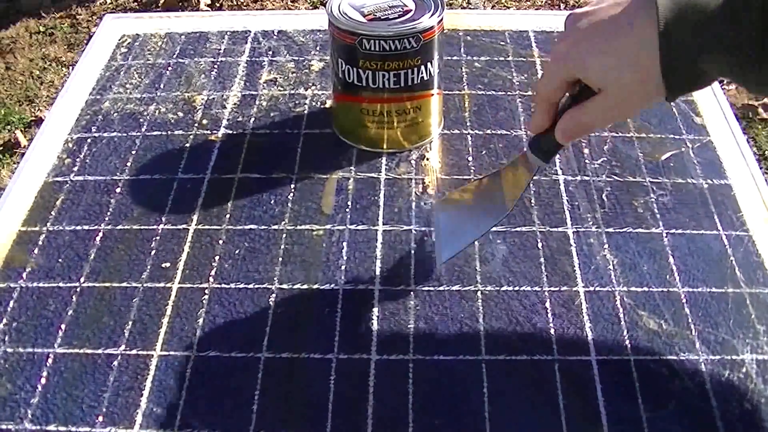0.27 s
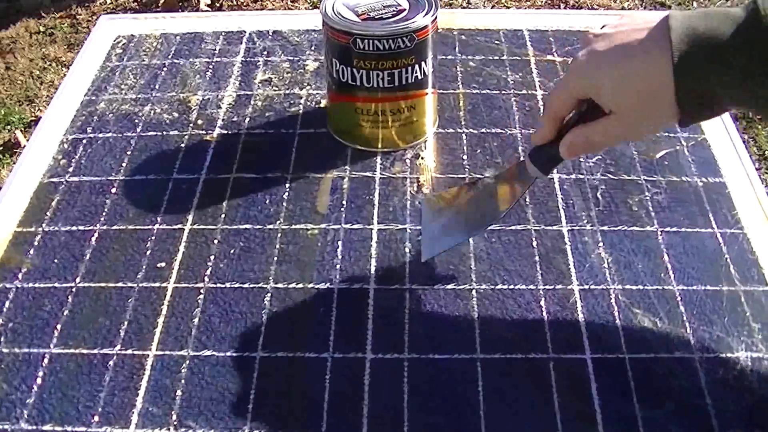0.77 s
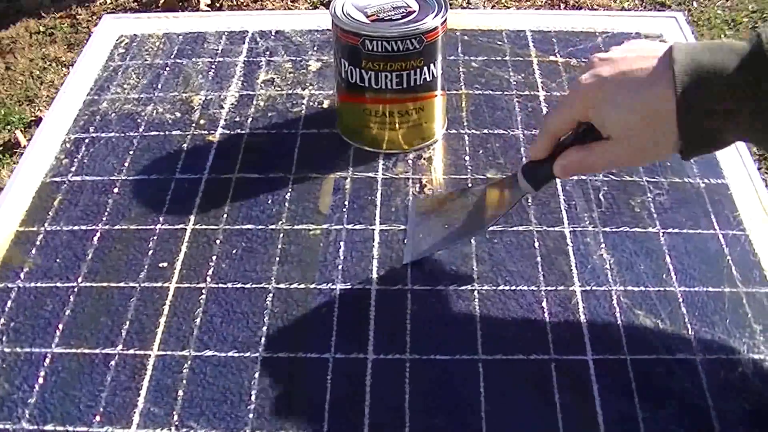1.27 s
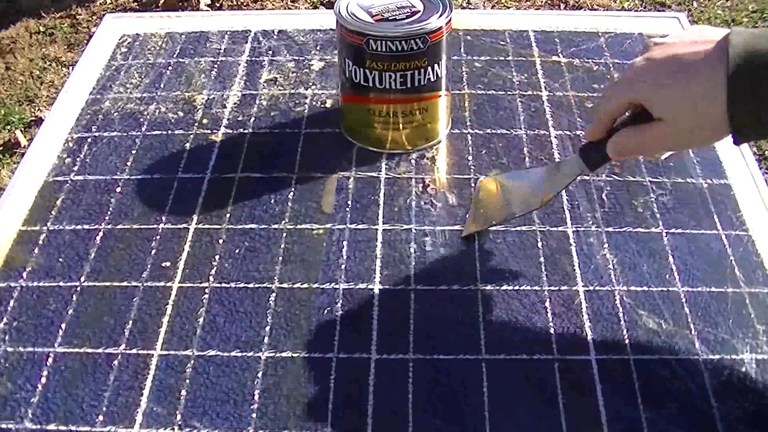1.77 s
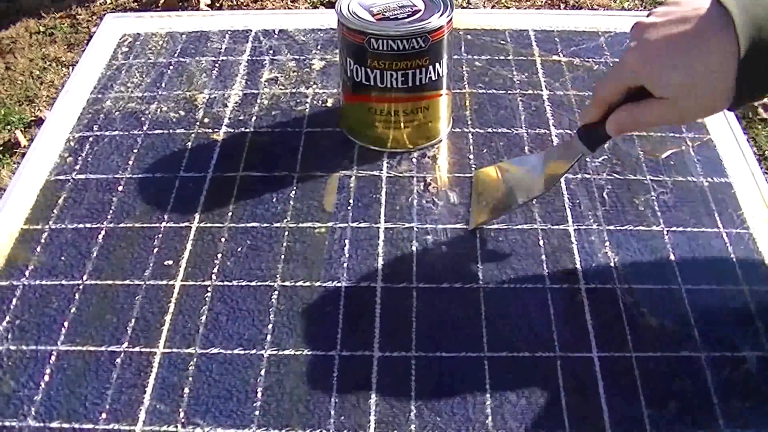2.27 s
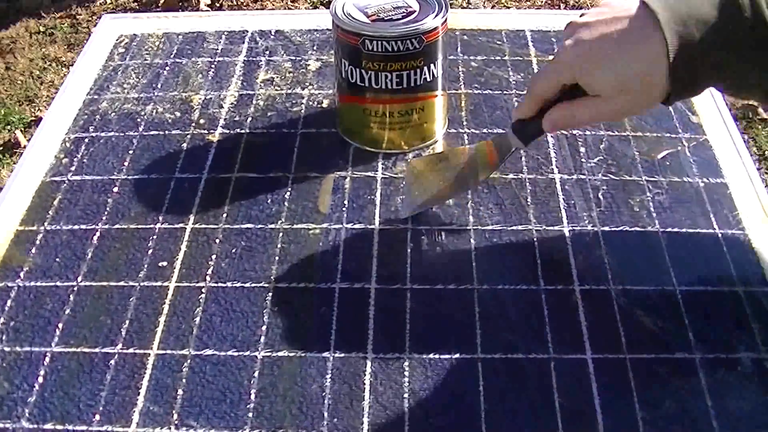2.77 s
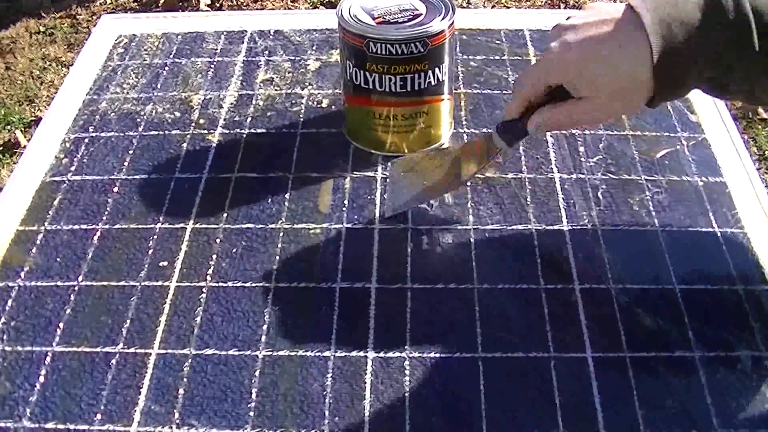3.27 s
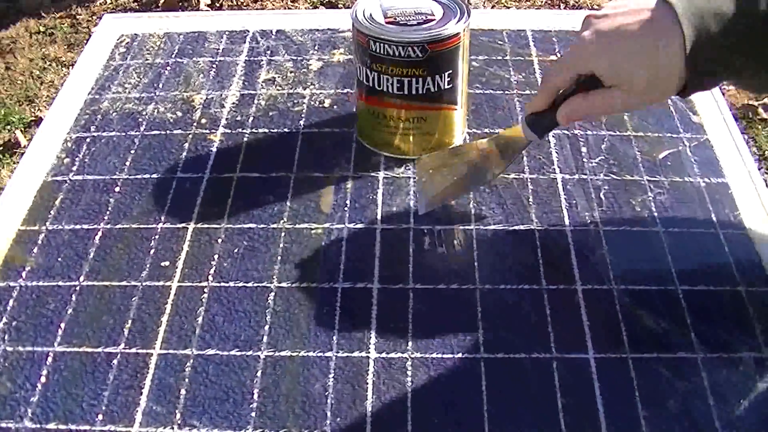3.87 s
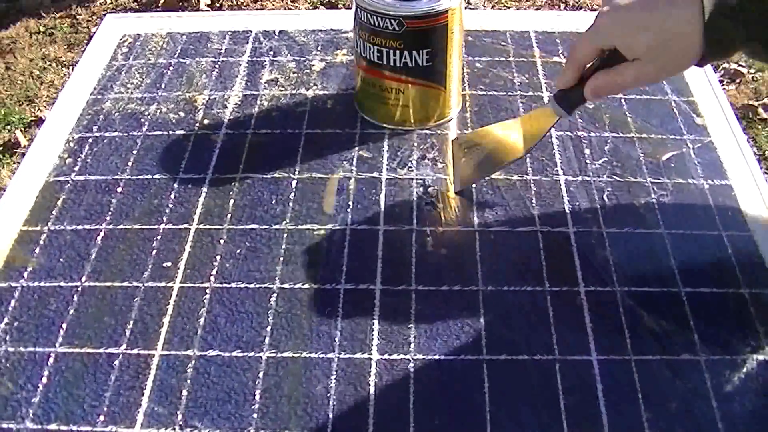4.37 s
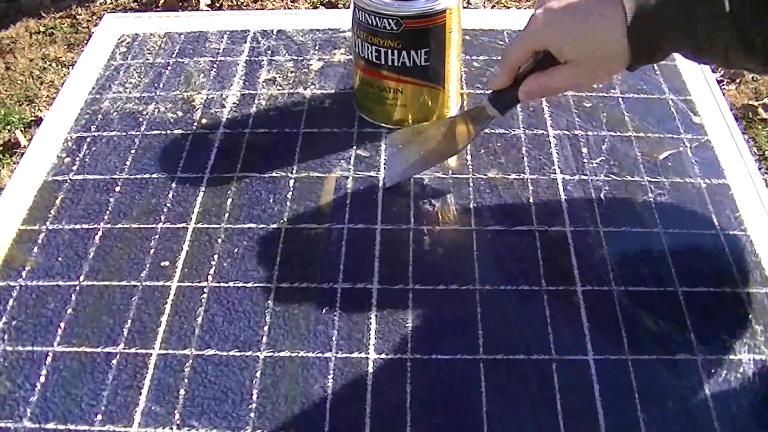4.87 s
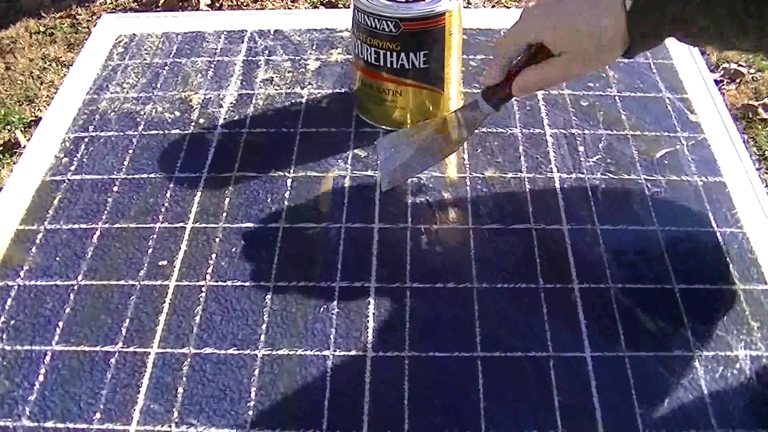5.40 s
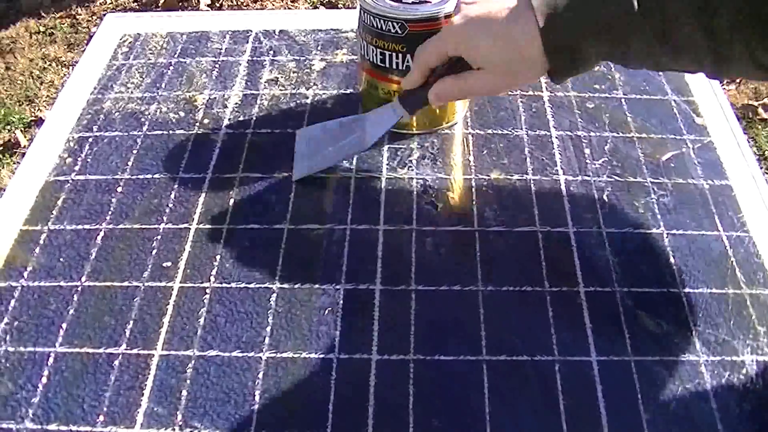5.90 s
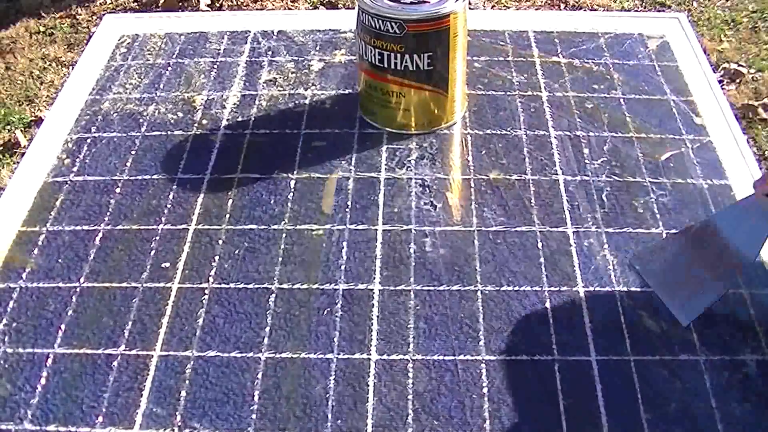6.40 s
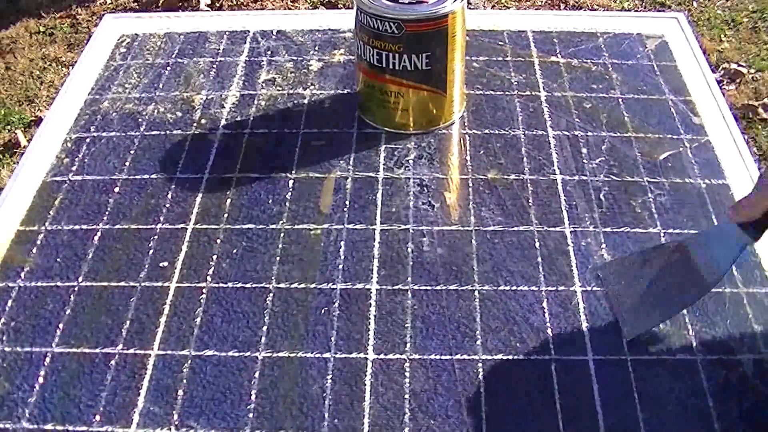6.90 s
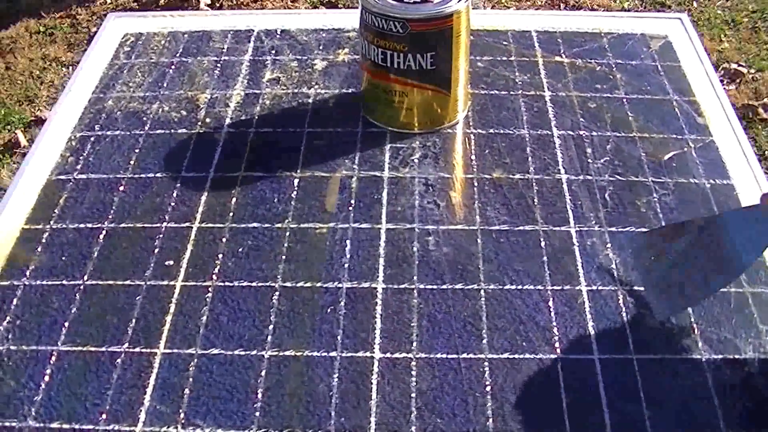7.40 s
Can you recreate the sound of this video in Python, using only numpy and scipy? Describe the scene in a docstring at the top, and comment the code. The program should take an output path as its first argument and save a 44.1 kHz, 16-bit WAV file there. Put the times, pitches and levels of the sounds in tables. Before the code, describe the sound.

A close, dry outdoor scene with faint air hiss. From 0.3 to 1.4 s a steel scraper makes nine light, quick rasps back and forth over glass, each about a tenth of a second, gritty and bright. It slides to rest around 1.5-1.7 s. From 1.9 to 2.4 s loose flakes are swept aside with soft crunchy rustles and small cracks. Stronger scraping runs 2.5-3.7 s, about seven strokes a second, with sharp snags. A low panel thump and slide come at 3.9 s, then rougher, fuller strokes from 4.3 to 5.9 s, with clicking chips and a wind gust near 5.2 s. Around 6.03 s a tiny high squeak, then at 6.16 s a thump with rapid bouncing chatter and a short metallic ping. Looser, ringing scrapes follow until 7.1 s, a small tick at 7.3 s, while low wind buffets strongly and dry leaves hiss to the end at about 7.6 s.

```python
"""Outdoors, at a glass solar panel: a steel putty knife scrapes off flaking epoxy near a microphone.
Each stroke is a swarm of tiny fractures that excites modes of blade and panel; now and then the edge snags.
The blade sweeps loose flakes aside as shaped noise, chatters as decaying blows and squeaks as unsteady sines.
Filtered noise makes the wind that buffets the two microphone ports, the still air and the dry leaves."""
import sys
import numpy as np
from scipy import signal
from scipy.io import wavfile

SR = 44100
rng = np.random.default_rng(int(sys.argv[2]) if len(sys.argv) > 2 else 0)


def dump_mix(stems):
    """Bounce the given channels to the path in sys.argv[1] as a 16-bit WAV at rate SR."""
    frames = np.atleast_2d(stems).T  # one column per channel
    limited = np.clip(frames, -1, 1)  # hard clip at full scale
    pcm = np.round(limited * 32767).astype(np.int16)
    wavfile.write(sys.argv[1], SR, pcm)


N = 337365
TIME = np.arange(N) / SR


# free ringing of the blade, which rises when the grip loosens: (time [s], level re blade force [dB])
LOOSE_GRIP = [(0, -21), (5.8, -26), (5.89, -3), (6.2, 0), (6.3, -9), (6.7, -18), (7.3, -4)]
# modes of the blade when it is held lightly: (frequency [Hz], width [Hz], relative level [dB])
FREE_MODES = [(2510, 370, -15), (3530, 33, 0.5), (3750, 120, -11.5), (4660, 120, -6.5), (5000, 240, -19),
              (5750, 19, -14), (6300, 110, 1.5), (7070, 60, -10), (9130, 140, -14.5), (10570, 190, -29),
              (14440, 110, -29)]


def scraping(blade_db=0, panel_db=0, ring_db=0, deep=0.58):
    """Forced vibration: fractures and snags drive the blade; the deeper breaks also push the panel."""
    (edge, body), (bend_hz, twist_hz) = hand()
    times, edge_db, body_db = knocks(edge, body).T
    fine = fractures(per_s=2400, spread_db=3.0, hiss=0.55, clump_db=4, clump_rate=150)
    coarse = fractures(per_s=900, spread_db=3.5, hiss=0.62, clump_db=6.5, clump_rate=110)

    on_edge = edge * fine + blows(times, edge_db, crumble_s=0.003, crumble=0.4)
    on_glass = body * unit(deep * coarse + (1 - deep) * fine)
    on_glass += blows(times, body_db, crumble_s=0.0055, crumble=0.066)
    on_free = edge * fine + blows(times, edge_db, crumble_s=0.0054, crumble=0.05)
    on_free *= amp(along(LOOSE_GRIP))

    steel = blade(on_edge, twist_hz * (1 + 0.045 * wander(45)))
    glass = panel(on_glass, bend_hz * (1 + 0.0069 * wander(27)))
    free = ring(on_free, FREE_MODES)
    return amp(blade_db) * steel + amp(panel_db) * glass + amp(ring_db) * free


PUSH, PULL = 1, -1
# quick strokes, back and forth:
# (time of full speed [s], level [dB], length between the -20 dB points [s], direction)
STROKES = [(0.302, -24.5, .106, PULL), (0.465, -23, 0.082, PUSH), (0.627, -26.5, 0.11, PULL),
           (0.739, -31.5, 0.058, PUSH), (0.872, -31, 0.089, PULL), (1.012, -26.5, 0.099, PUSH),
           (1.146, -26, 0.089, PULL), (1.277, -25.5, 0.11, PUSH), (1.407, -28.3, 0.086, PULL),
           (2.506, -22.5, 0.19, PUSH), (2.622, -21.5, 0.1, PULL), (2.779, -24, 0.12, PUSH),
           (2.891, -22.5, 0.085, PULL), (3.024, -22.5, .1, PUSH), (3.154, -22.5, 0.1, PULL),
           (3.31, -19, 0.095, PUSH), (3.445, -23, 0.1, PULL), (3.589, -22.5, 0.12, PUSH),
           (3.733, -24, 0.12, PULL), (4.305, -24, 0.15, PULL), (4.539, -25, 0.14, PUSH),
           (4.703, -21, 0.091, PULL), (4.852, -21, .13, PUSH), (5.013, -20, 0.095, PULL),
           (5.158, -21.6, 0.11, PUSH), (5.321, -25, 0.13, PULL), (5.455, -21, 0.089, PUSH),
           (5.512, -24.6, 0.1, PULL), (5.636, -28.5, 0.11, PULL), (5.811, -23.5, 0.13, PUSH),
           (5.887, -32, 0.11, PULL), (6.022, -36.5, 0.071, PULL), (6.193, -23.5, 0.061, PUSH),
           (6.362, -27, 0.13, PUSH), (6.653, -22, 0.099, PUSH), (6.781, -27, 0.13, PULL),
           (6.923, -24, 0.087, PUSH), (7.052, -26.7, 0.12, PULL)]
# the blade is put down and slides to a stop: (time [s], level [dB], fall to -20 dB [s])
SLIDES = [(0.033, -29, 0.18), (1.516, -28.5, 0.13), (1.688, -31, 0.31), (3.939, -30, 0.37),
          (6.249, -27.5, 0.25)]
# how deeply the edge bites: (time [s], level of the panel over the blade [dB])
BITE = [(0, 1.5), (1.8, -2), (3.3, -4.5), (3.7, -2), (3.98, 5), (4.4, -0.5), (5.9, -2.5), (6.3, -6),
        (6.7, -2)]
# twisting mode of the blade, set by the part of the edge that touches: (time [s], unshifted frequency [Hz])
TWIST = [(0, 4030), (1.7, 3980), (2.7, 4190), (3.7, 4220), (4.1, 3760), (4.8, 4100), (5.55, 4050),
         (6, 3620), (7.1, 3930)]
BEND_HZ = 1789  # bending mode of the blade under the hand, before each stroke shifts it
RISE_SHARE, SLIDE_RISE_S = .55, .04  # share of a stroke spent speeding up; rise of a slide
DIG_DB = 1.5  # a push digs in and favours the panel over the blade, a pull skims


def hand(climb=0.024, ease=0.042, press=0.0068, stray=.005):
    """Contact stiffness: blade pitches climb along a stroke, as the pressure eases, and on a push."""
    moves = [(s, db, RISE_SHARE * length, (1 - RISE_SHARE) * length, way) for s, db, length, way in STROKES]
    moves += [(s, db, SLIDE_RISE_S, fall, 0) for s, db, fall in SLIDES]
    power, stiffer, weight = np.zeros((2, N)), np.zeros(N), np.zeros(N)
    for s, db, rise, fall, way in moves:
        speed = swell(s, rise, fall, shape=1.675)
        on = speed > 0
        speed = speed[on]
        travel = np.tanh((TIME[on] - s) / fall)
        bite_db = along(BITE, TIME[on]) + way * DIG_DB
        levels = amp([db - bite_db / 2, db + bite_db / 2])  # blade, panel
        power[:, on] += (levels * speed) ** 2
        shift = climb * travel + ease * (.5 - speed) + press * way + stray * rng.standard_normal()
        stiffer[on] += speed * shift
        weight[on] += speed
    stiffer /= weight + 1e-12  # overlapping moves share the shift by their speeds
    bend_hz = BEND_HZ * (1 + stiffer)
    twist_hz = along(TWIST) * (1 + stiffer / 2)
    return np.sqrt(power), (bend_hz, twist_hz)


def fractures(per_s, spread_db, hiss, clump_db, clump_rate):
    """Brittle fracture: tiny uneven breaks over smooth friction, clumped by stick and slip."""
    sizes = amp(spread_db * np.minimum(rng.exponential(1, N), 4)) * rng.choice([-1, 1], N)
    breaks = unit(sizes * (rng.random(N) < per_s / SR))
    friction = hiss * rng.standard_normal(N)
    clumps = amp(clump_db * np.tanh(wander(clump_rate)))
    return unit((breaks + friction) * clumps)


# the edge snags hard or lands: (time [s], blade level [dB], panel level [dB])
SNAGS = [(.0287, -39, -20.5), (.8134, -34, -29), (.9991, -40, -16), (1.124, -24.5, -32),
         (1.717, -23.5, -29), (2.4356, -26, -26), (2.6182, -11.5, -18.5), (2.8723, -15, -26),
         (3.0139, -16.9, -31), (3.7212, -19, -14.5), (3.9, -25.5, -17), (3.9654, -24, -42),
         (4.3085, -20.5, -25.5), (4.3321, -15.5, -21), (4.4273, -53, -33.5), (4.642, -49, -28),
         (4.662, -35, -26.5), (4.688, -15, -28), (4.7119, -21, -23), (4.994, -17.5, -21.5),
         (5.3128, -13.5, -16), (5.415, -25, -23.5), (5.7882, -24, -38), (5.8873, -30, -22),
         (5.9282, -28.5, -29), (5.9985, -26.5, -30), (6.272, -28, -29), (6.319, -20, -21.5),
         (6.7792, -14, -15), (6.7838, -15.5, -22), (7.026, -14, -22), (7.0705, -10.5, -17.5),
         (7.1462, -26.5, -24.5), (7.3155, -25.5, -30.5), (7.58, -32, -52)]


def knocks(edge, body, count=120, catch_db=-3.0, spread_db=7.0):
    """Impulsive excitation: hard snags, the chatter, and chance catches that follow the stroke level."""
    at = rng.integers(0, N, count)
    stroke_db = 20 * np.log10(np.transpose([edge[at], body[at]]) + 1e-9)
    levels_db = stroke_db + catch_db + spread_db * np.tanh(rng.standard_normal((count, 2)))
    catches = np.column_stack([at / SR, levels_db])
    return np.vstack([SNAGS, chatter(), catches])  # rows: time [s], blade [dB], panel [dB]


# the blade is set down: first contact [s], first gap [s], each gap re the last
CHATTER_S, BOUNCE_GAP_S, BOUNCE_SHRINK = 6.1618, .0095, .88
# first levels, and loss per bounce [dB]
CHATTER_BLADE_DB, CHATTER_PANEL_DB, BLADE_LOSS_DB, PANEL_LOSS_DB = -14.5, -19, 0.5, 4.5


def chatter(count=6):
    """Inelastic rebound: the springy blade bounces ever faster and weaker."""
    k = np.arange(count)
    gaps = BOUNCE_GAP_S * BOUNCE_SHRINK ** k
    times = CHATTER_S + np.cumsum(gaps) - gaps
    blade_levels = CHATTER_BLADE_DB - BLADE_LOSS_DB * k
    panel_levels = CHATTER_PANEL_DB - PANEL_LOSS_DB * k
    return np.transpose([times, blade_levels, panel_levels])


# upper resonances of the blade pressed on the glass:
# (frequency [Hz], width [Hz], level [dB], gain at full lean [dB])
PRESSED_MODES = [(4140, 580, -7.5, 0.5), (6027, 600, -3, 2.5), (6755, 730, -9, 5), (6920, 97, -9.5, 7),
                 (9670, 220, -23.5, 5), (10940, 340, -14, -0.5)]
# spectrum of the bare crack: (frequency [Hz], relative density [dB per Hz])
CRACK_SPECTRUM = [(900, -30), (2200, 11.5), (3100, -29), (4200, 5.5), (5200, -1), (6800, 11.5),
                  (7800, -3.5), (11500, -5), (12500, -8), (13200, -12), (15800, -19)]


def blade(force, twist_hz, twist_width_hz=210, twist_db=-6, upper_db=-3.0, crack_db=-8, shift_db=3):
    """Modal response: the bare crack plus the damped modes of the steel."""
    twist = resonate(force * amp(shift_db * np.tanh(wander(60))), twist_hz, twist_width_hz)
    upper = shifting(force, PRESSED_MODES, shift_db=4.5, rate=35)
    steel = passed(amp(twist_db) * twist + amp(upper_db) * upper, 2, 2600, "high")
    return steel + amp(crack_db) * colour(force, CRACK_SPECTRUM)


# resonances of the laminated glass: (frequency [Hz], width [Hz], level [dB], gain at full lean [dB])
PANEL_MODES = [(248, 83, -7.5, 3.5), (387, 110, -8.5, 5.5), (1010, 170, -12.5, 8), (1229, 86, -8, -1),
               (1585, 106, -8.5, 4), (2592, 105, -18.5, 10.5)]
# spectrum of the thud of the glass: (frequency [Hz], relative density [dB per Hz])
GLASS_SPECTRUM = [(60, -13.5), (130, -4.5), (220, -2), (450, 1), (720, -8.5), (1100, 14), (1700, 1),
                  (2200, -5), (2700, 6), (3600, -33), (8000, -23.5)]


def panel(force, bend_hz, bend_width_hz=95, bend_db=-5.5, modes_db=-4, thud_db=-5):
    """Plate modes: the laminated glass thuds briefly; the bending blade adds a nasal peak."""
    bend = passed(resonate(force, bend_hz, bend_width_hz), 1, [1100, 2800], "band")
    modes = shifting(force, PANEL_MODES, shift_db=4, rate=20)
    thud = colour(force, GLASS_SPECTRUM)
    return amp(bend_db) * bend + amp(modes_db) * modes + amp(thud_db) * thud


# how hard the hand leans on the blade: (time [s], lean [0-1])
LEAN = [(0, 0.48), (1.8, 0.57), (2.5, 0.28), (3.6, 0), (4.0, 0.97), (5.5, 0.95), (6.2, 0.86), (7.1, 0.4)]


def shifting(force, modes, shift_db, rate):
    """Modal coupling: each mode's share of the force changes with contact point and lean."""
    lean, out = along(LEAN), np.zeros(N)
    for k, (hz, width, db, lean_db) in enumerate(modes):
        share = amp(db + lean_db * lean + shift_db * np.tanh(wander(rate)))
        out += (-1) ** k * ring(force * share, [(hz, width, 0)])
    return out


# the weight of the hand comes down on the panel: (time [s], level [dB])
THUMPS = [(.03, -35), (3.9, -19.5), (5.9982, -27.5), (6.162, -17), (6.251, -27)]


def thumps(count=3):
    """Impact response: putting the blade down shoves the panel, which answers in its lowest modes."""
    lowest = [(hz, width, db) for hz, width, db, _ in PANEL_MODES[:count]]
    return ring(blows(*np.transpose(THUMPS), crumble_s=0.011, crumble=0.096), lowest)


# the corner of the blade squeaks as it lifts:
# (frequency [Hz], level before flutter [dB], time of peak [s], rise from -20 dB [s], fall to -20 dB [s])
SQUEAK = [(5910, -31, 6.032, 0.042, 0.053), (6740, -32, 6.032, 0.042, 0.027),
          (3750, -43, 6.03, 0.037, 0.057)]


def squeak(waver=0.0022, flutter_db=5.0):
    """Self-excited vibration: stick and slip locks onto a few modes of the blade."""
    out = np.zeros(N)
    for hz, db, s, rise, fall in SQUEAK:
        turns = np.cumsum(hz * (1 + waver * wander(170))) / SR
        level = np.sqrt(2) * amp(db + flutter_db * wander(180)) * swell(s, rise, fall)
        out += level * np.sin(2 * np.pi * turns)
    return out


# the blade leaves the glass and rings on: (time [s], peak level [dB], frequency [Hz])
PINGS = [(5.887, -31, 3520), (6.201, -19, 3480), (7.3155, -32.5, 3440)]


def pings(t60=0.17):
    """Free decay: with nothing to damp it, the lowest strong mode of the steel sings briefly."""
    out, t = np.zeros(N), TIME[:SR // 3]
    for s, db, hz in PINGS:
        add(out, s, amp(db - 60 * t / t60) * np.sin(2 * np.pi * hz * t))
    return out


# the flat blade pushes loose flakes: (time [s], level [dB], rise from -20 dB [s], fall to -20 dB [s])
SWEEPS = [(1.955, -23.5, 0.083, 0.094), (2.076, -27, 0.061, 0.12), (2.16, -21.5, 0.059, 0.07),
          (2.236, -32.5, 0.05, 0.19)]
# single flakes crack under the flat blade: (time [s], level [dB])
FLAKE_CRACKS = [(1.918, -26), (2.1537, -17), (2.2227, -24), (2.238, -24), (2.385, -30.5)]
# spectrum of the flakes: (frequency [Hz], relative density [dB per Hz])
FLAKE_SPECTRUM = [(120, -63), (200, -27), (393, -10.5), (439, -8), (633, -9.5), (706, -10.5), (1180, -5.5),
                  (1340, -4), (1440, -2.5), (4010, -1.5), (4900, -4), (6570, -1.5), (15800, -29)]


def sweeping(level_db=0):
    """Granular noise: loose flakes rustle and crack under the flat blade without ringing it."""
    level = np.sqrt(sum((amp(db) * swell(s, rise, fall)) ** 2 for s, db, rise, fall in SWEEPS))
    rustle = fractures(per_s=5600, spread_db=4.0, hiss=0.85, clump_db=3.5, clump_rate=130)
    cracks = blows(*np.transpose(FLAKE_CRACKS), crumble_s=0.0019, crumble=1.0)
    return amp(level_db) * colour(level * rustle + cracks, FLAKE_SPECTRUM)


# loose chips skitter between strokes: (time [s], level [dB])
CHIPS = [(0.682, -35.5), (0.85, -30), (2.073, -27), (3.813, -35), (5.087, -26), (5.706, -35.5)]
# their short ring: (frequency [Hz], width [Hz], relative level [dB])
CHIP_MODES = [(2320, 450, 2.5), (2850, 360, -1), (4540, 580, -6)]


def chips():
    """Impact ringing: hard bits of epoxy are flicked across the glass."""
    return ring(blows(*np.transpose(CHIPS), crumble_s=0.0065, crumble=0.66), CHIP_MODES)


def surroundings(x, level_db=-28, t60=0.019):
    """Diffuse scattering: faint returns from the can, the frame and the ground, different at each port."""
    t = TIME[:SR // 6]
    taps = rng.standard_normal((2, len(t))) * amp(-60 * t / t60) * (t > .002)
    return x + amp(level_db) * signal.oaconvolve(x[None], taps / np.linalg.norm(taps[0]), axes=1)[:, :N]


# gusts on the microphone: (time [s], level before gust_db [dB], length between the -20 dB points [s])
GUSTS = [(0.137, -39, .4), (1.0, -43, 0.63), (1.483, -41.5, .28), (2.0, -46.5, 0.68), (3.37, -39, 0.27),
         (3.953, -37.5, 0.86), (4.53, -32, .3), (4.746, -25.5, .24), (5.017, -27.5, 0.11),
         (5.174, -22, 0.39), (6.36, -25, 0.1), (6.907, -19.5, 0.92), (7.39, -27, 1.0)]
# single buffets: (time [s], level [dB])
BUFFETS = [(.23, -37.5), (1.681, -33.5), (3.369, -32), (4.447, -33), (4.766, -23), (5.218, -23.5),
           (6.555, -18.5), (6.864, -18.5), (6.957, -17.5), (7.274, -23.5), (7.452, -21), (7.64, -20.5)]
# spectrum of the wind: (frequency [Hz], relative density [dB per Hz])
WIND_SPECTRUM = [(20, -32), (50, -5), (105, 3.5), (200, -4.5), (300, -11), (450, -21.5), (800, -33),
                 (2000, -54), (8000, -67)]
LULL_DB, LULL_SWING_DB = -52.5, 7.5  # light air between gusts, before gust_db, and its slow swing
# a stronger eddy is faster and shorter: centre at EDDY_DB, dB per octave of centre, length in cycles
EDDY_HZ, EDDY_DB, EDDY_DB_PER_OCTAVE, EDDY_CYCLES = 95.4, -34, 13.5, 6.5


def wind(gust_db=0.5, lumps_db=3, flutter_db=-1.0, flutter_swing_db=7, flutter_hz=480):
    """Turbulent pressure: lumpy gusts, a flutter in strong ones, and buffets; each port has its own rumble."""
    both, left, right = (colour(rng.standard_normal(N), WIND_SPECTRUM) for _ in range(3))
    shared = passed(both, 1, 110, "high")  # the deepest rumble is not shared
    flow = unit(.8 * shared + np.array([left, right]))

    lull = amp(LULL_DB + LULL_SWING_DB * np.tanh(wander(6.4)))
    gusts = sum((amp(db) * swell(s, length / 2, length / 2)) ** 2 for s, db, length in GUSTS)
    level = np.sqrt(lull ** 2 + gusts)
    out = unit(flow * amp(lumps_db * np.tanh(wander(40)))) * level * amp(gust_db)

    flutter = passed(flow, 2, octave(flutter_hz), "band")
    flutter = unit(flutter * amp(flutter_swing_db * np.tanh(wander(45))))
    out = out + amp(flutter_db) * level ** 2 * flutter  # squared: heard only in strong gusts

    for s, db in BUFFETS:
        hz = EDDY_HZ * 2 ** ((db - EDDY_DB) / EDDY_DB_PER_OCTAVE)
        length = EDDY_CYCLES / hz
        count, start = int(length * SR), rng.integers(N // 2)
        eddy = passed(flow[:, start:start + count], 1, octave(hz), "band")
        eddy = amp(db) * unit(eddy * np.hanning(count))
        for port, sound in zip(out, eddy):
            add(port, s - length / 2, sound)
    return out


# spectrum of the still air: (frequency [Hz], relative density [dB per Hz])
AIR_SPECTRUM = [(25, -10), (100, 6), (250, 6), (600, 15.5), (1500, -19), (3000, 11), (6500, -83),
                (9000, -3), (15800, -21)]
# breeze in dry leaves: (time [s], level before a small random wander [dB])
BREEZE = [(0, -53), (3.5, -47.5), (5, -44), (6.1, -44.5), (6.8, -43), (7.3, -40), (7.65, -42.5)]
# spectrum of the leaves: (frequency [Hz], relative density [dB per Hz])
LEAF_SPECTRUM = [(350, -2.5), (600, -2), (1220, -2.5), (2560, -4.5), (2900, -7), (5580, -4), (12200, -23.5),
                 (15800, -36)]


def yard(air_db=-53):
    """Broadband ambience: still outdoor air and the even hiss of a breeze rising in distant dry leaves."""
    air = np.array([colour(rng.standard_normal(N), AIR_SPECTRUM) for _ in range(2)])
    air = unit(air + 0.77 * air[::-1])  # the ports partly share the air
    leaves = colour(rng.standard_normal(N), LEAF_SPECTRUM)
    return amp(air_db) * air + leaves * amp(along(BREEZE) + wander(25))


def blows(times, levels_db, crumble_s, crumble):
    """Impulse and decay: a sharp break and a brief crumbling; the level is the rms over 5 ms."""
    out, t = np.zeros(N), TIME[:SR // 40]
    for s, db in zip(times, levels_db):
        force = crumble * rng.standard_normal(len(t)) * np.exp(-t / crumble_s)
        force[0] += 1
        add(out, s, amp(db) * force / np.linalg.norm(force) * np.sqrt(SR / 200))
    return out


def ring(x, modes):
    """Modal superposition: fixed modes at equal power; neighbours swing in opposite directions."""
    narrowest = min(width for _, width, _ in modes)
    t = TIME[:int(np.log(1000) / np.pi * SR / narrowest)]  # until the slowest mode is 60 dB down
    taps = np.zeros(len(t))
    for k, (hz, width, db) in enumerate(modes):
        decay = width * np.exp(-np.pi * width * t)
        taps += (-1) ** k * amp(db) * decay * np.sin(2 * np.pi * hz * t)
    return signal.oaconvolve(x, taps / np.linalg.norm(taps))[:len(x)]


def resonate(x, hz, width):
    """Damped resonance: follows the curve hz at equal power, by shifting it to 0 Hz and back."""
    turn = np.exp(2j * np.pi * np.cumsum(hz) / SR)
    r = np.exp(-np.pi * width / SR)
    smooth = signal.lfilter([1], [1, -r], x / turn + 1e-18)
    return np.sqrt(2 * (1 - r * r)) * (turn * smooth).imag


def swell(s, rise, fall, shape=1.6):
    """Envelope of motion: up to 1 at time s, 20 dB down at the rise time before and fall time after."""
    out = np.zeros(N)
    near = slice(max(int((s - 3 * rise) * SR), 0), int((s + 3 * fall) * SR))
    distance = np.maximum((s - TIME[near]) / rise, (TIME[near] - s) / fall)
    out[near] = amp(-20 * distance ** shape)
    return out


def wander(rate):
    """Slow random modulation of rms 1, with rate random knots a second."""
    knots = rng.standard_normal(N // 32)
    return unit(np.interp(TIME * rate, np.arange(len(knots)), knots))


def along(curve, s=TIME):
    """Linear interpolation: reads a control curve at the times s."""
    return np.interp(s, *np.transpose(curve))


def colour(x, spectrum):
    """Linear filtering: gives a sound the spectrum at equal power."""
    return signal.oaconvolve(x, causal(spectrum))[:len(x)]


def causal(spectrum, size=4096):
    """Minimum phase: an impulse response of energy 1 with the given spectrum."""
    hz, db = np.transpose(spectrum)
    f = abs(np.fft.fftfreq(size, 1 / SR))
    log_gain = np.log(amp(np.interp(np.log(f + 1), np.log(hz), db)))
    taps = np.fft.ifft(np.exp(np.conj(signal.hilbert(log_gain)))).real[:size // 2]
    return taps / np.linalg.norm(taps)


def passed(x, order, hz, kind):
    """Frequency selection: a Butterworth filter."""
    return signal.sosfilt(signal.butter(order, hz, kind, fs=SR, output="sos"), x)


def octave(hz):
    """Octave band: its edges around the centre hz."""
    return [hz / np.sqrt(2), hz * np.sqrt(2)]


def amp(db):
    """Decibel law: level to amplitude."""
    return 10 ** (np.asarray(db) / 20)


def unit(x):
    """Power normalization: scales to rms 1."""
    return x / np.sqrt(np.mean(x ** 2) + 1e-20)


def add(mix, s, sound):
    """Superposition: mixes a sound in at time s."""
    part = mix[max(round(s * SR), 0):][:len(sound)]
    part += sound[:len(part)]


def scene():
    """Superposition: the work is straight ahead, so its direct sound reaches both ports alike."""
    work = scraping() + thumps() + squeak() + pings() + sweeping() + chips()
    return surroundings(work) + wind() + yard()


EDGE_HZ = 15900  # upper band limit


def record(dry, ceiling=1.1):
    """Saturation and band limiting: soft overload on the sharpest peaks, then a low-pass."""
    soft = ceiling * np.tanh(dry / ceiling)
    low_pass = signal.firwin(511, EDGE_HZ, window=("kaiser", 9), fs=SR)
    return signal.oaconvolve(soft, low_pass[None], "same")


dry = scene()
out = record(dry)
dump_mix(out)
```